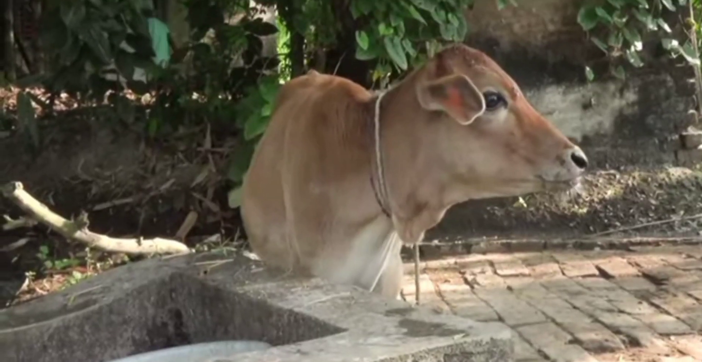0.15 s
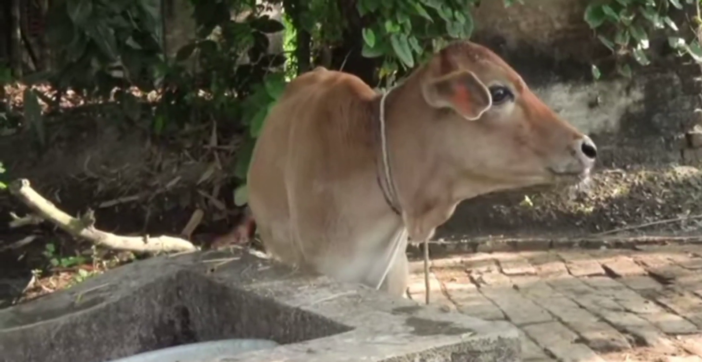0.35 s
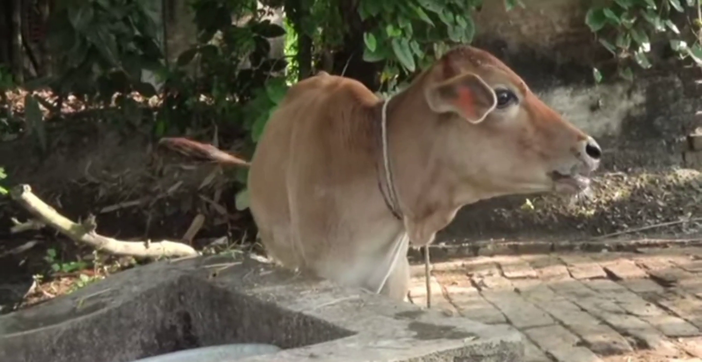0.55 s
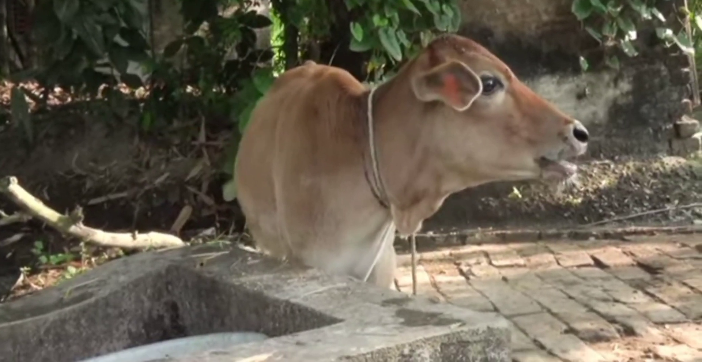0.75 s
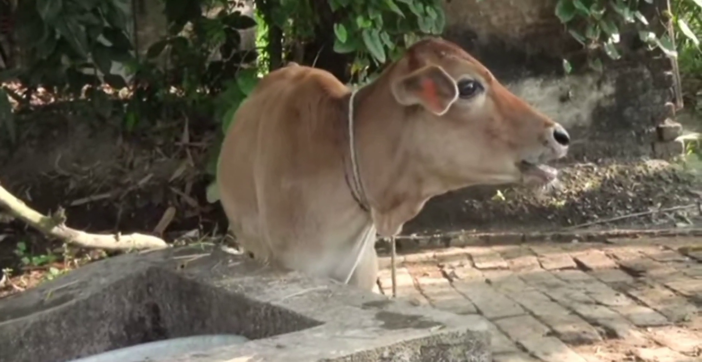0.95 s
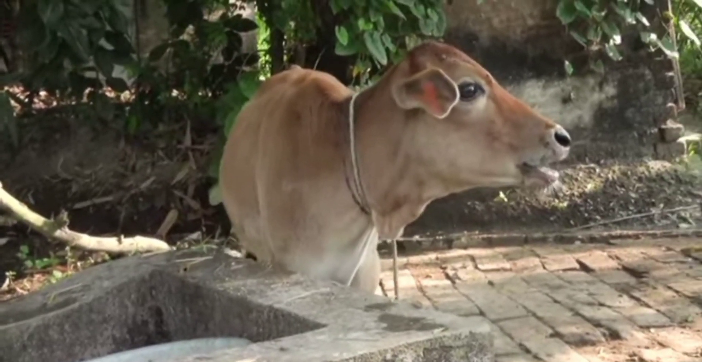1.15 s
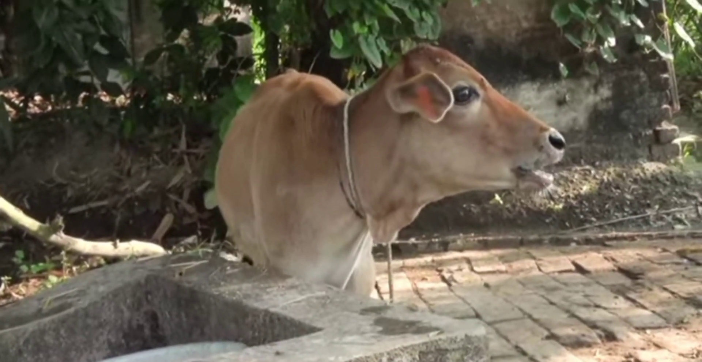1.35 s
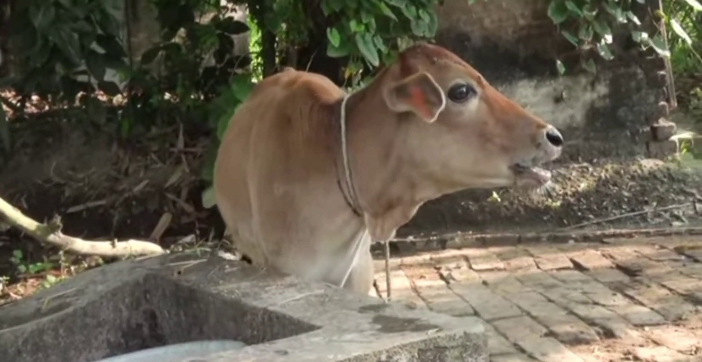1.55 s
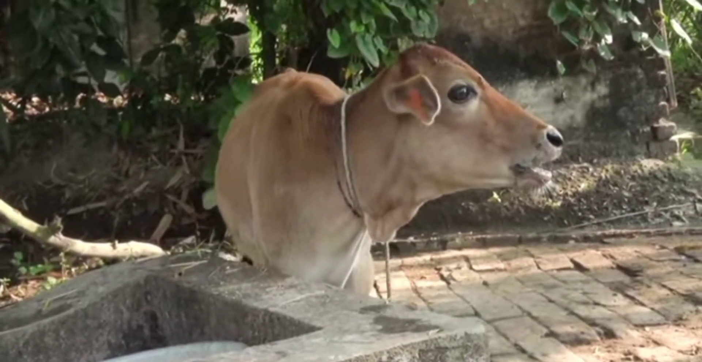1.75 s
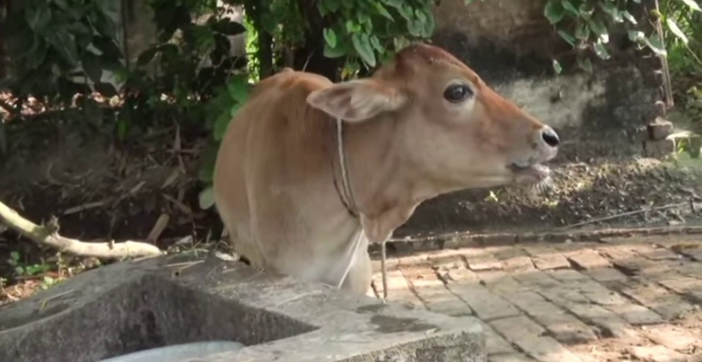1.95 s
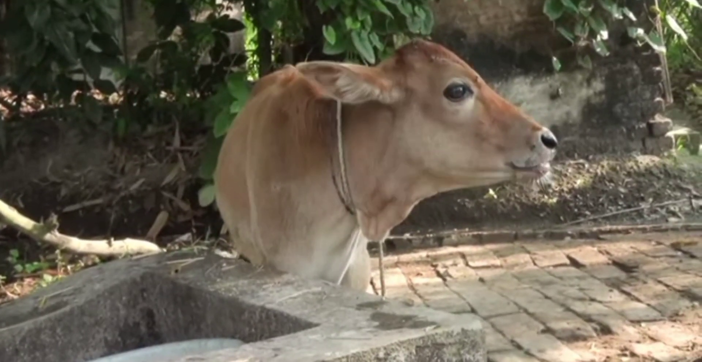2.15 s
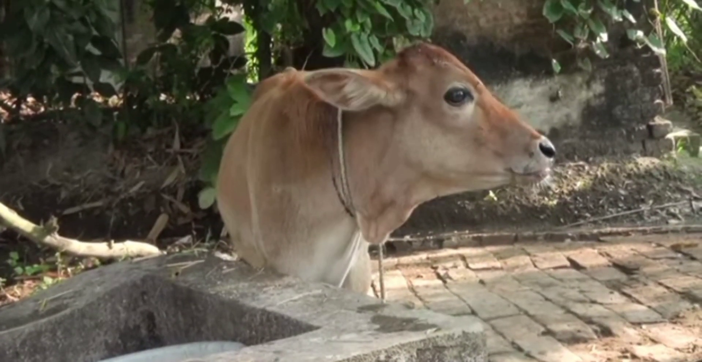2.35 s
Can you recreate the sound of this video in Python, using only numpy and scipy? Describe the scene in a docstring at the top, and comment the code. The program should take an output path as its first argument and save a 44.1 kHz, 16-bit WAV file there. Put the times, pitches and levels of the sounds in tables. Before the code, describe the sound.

One long calf moo in a small walled yard: faint mouth smacks and a nostril puff first, a raspy squeaky onset, a steady reedy call, then a croaky falling end, heard close with short dull reflections.

```python
"""A young calf gives one long moo in a walled village yard, over a low rumble and air hiss.
First come two small ticks (decaying noise), then a short snort (a gated blast of coloured noise).
The call opens as a hoarse rasp: noise excites sliding resonances. It locks into a clear buzzing tone,
fold pulses filtered by throat and mouth, that arches in pitch. Last it runs down into slow, rough
pulses as the mouth closes. Thin hisses accompany it; the yard scatters every sound of the calf."""
import sys
import numpy as np
from scipy import signal
from scipy.fft import rfft, irfft
from scipy.io import wavfile
from scipy.ndimage import uniform_filter1d, map_coordinates

SR = 44100
rng = np.random.default_rng(int(sys.argv[2]) if len(sys.argv) > 2 else 0)


def digitize_waveform(pressure):
    """Quantize a signal to 16-bit integers and store it at the path in sys.argv[1].

    Rows of a 2-D input are taken as channels; values are limited to [-1, 1].
    """
    field = np.atleast_2d(pressure).T
    bounded = np.clip(field, -1, 1)
    quanta = np.round(bounded * 32767).astype(np.int16)
    wavfile.write(sys.argv[1], SR, quanta)


N = 108045
T = np.arange(N) / SR


def from_db(db):
    """Amplitude level: 20 dB is a tenfold gain."""
    return 10 ** (np.asarray(db) / 20)


def rms_one(x):
    """Power normalisation: scale to unit mean square."""
    return x / np.sqrt(np.mean(x ** 2) + 1e-20)


def in_time(rows):
    """Linear interpolation: join (t, value) rows with straight lines."""
    return np.interp(T, *np.transpose(rows))


def gate(start, end, edge):
    """Amplitude gating: tanh edges of scale edge (s) around a plateau of up to 1.08."""
    opening = 1 + np.tanh((T - start) / edge)
    closing = 1 + np.tanh((end - T) / edge)
    return 0.27 * opening * closing


def evened(x, span_s):
    """Envelope flattening: divide by the running RMS, so that the running power stays near one."""
    size = max(int(span_s * SR), 8)
    power = uniform_filter1d(uniform_filter1d(x * x, size), size)
    return x / np.sqrt(np.abs(power) + 1e-14)


def resonate(x, hz, width_hz):
    """Two-pole resonance, cascaded twice for steep skirts; unit gain near the peak."""
    r = np.exp(-np.pi * width_hz / SR)
    b = (1 - r * r) / 2 * np.array([1, 0, -1])
    a = [1, -2 * r * np.cos(2 * np.pi * hz / SR), r * r]
    once = signal.lfilter(b, a, x + 1e-18)
    return signal.lfilter(b, a, once)


def noise(spectrum):
    """Spectral shaping: white noise weighted over log frequency, then set to unit power."""
    hz, db = np.transpose(spectrum)
    bins_hz = np.fft.rfftfreq(N, 1 / SR)
    gain = from_db(np.interp(np.log(bins_hz + 1), np.log(hz), db))
    return rms_one(irfft(rfft(rng.standard_normal(N)) * gain, N))


def sliding(x, factor, colour):
    """Time-scaling principle: a fixed filter on a stretched clock has frequencies moved by factor."""
    clock = np.cumsum(factor)
    source_index = np.interp(np.arange(int(clock[-1])), clock, np.arange(N))
    stretched = map_coordinates(x, [source_index], order=3)
    return map_coordinates(colour(stretched), [clock], order=3)


# relative noise spectra of low rumble, open air and faint top hiss: f/Hz, density level/dB
RUMBLE = [(18, -60), (30, -27), (43, -14.5), (70, -28.5), (91, -16), (121, -5), (166, 2), (206, -1),
          (258, -14), (317, -12.5), (343, -10), (384, -10), (450, -9.5), (580, -55.5), (990, -120)]
AIR = [(180, 8), (300, -6.5), (397, -1), (500, -4.5), (685, 0), (953, -9), (1240, -5.5), (1700, -3.5),
       (2320, -8.5), (2740, -6), (3940, -13), (6250, -17.5), (15500, -36.5)]
SIZZLE = [(6000, -20), (10000, -12), (15000, 6.5)]
# their levels, lower during the call: t/s, level/dB
RUMBLE_LEVEL = [(0.0, -28.5), (0.03, -38), (0.3, -41.5), (0.37, -34.5), (0.7, -43), (1.38, -54.5),
                (2.05, -48.5), (2.38, -41), (2.45, -41)]
AIR_LEVEL = [(0, -35), (.15, -32.5), (.32, -32), (.45, -30.5), (.65, -43), (2.1, -46.5), (2.28, -39),
             (2.45, -37)]
SIZZLE_LEVEL = [(0, -55), (.4, -63), (.65, -82.5), (2.1, -67), (2.3, -59), (2.45, -52)]


def background():
    """Superposition of independent noise bands: a low rumble, open-air hiss and a faint top hiss."""
    layers = ((RUMBLE, RUMBLE_LEVEL), (AIR, AIR_LEVEL), (SIZZLE, SIZZLE_LEVEL))
    return sum(noise(spectrum) * from_db(in_time(level)) for spectrum, level in layers)


YARD_DB = -16  # energy of the whole tail
YARD_T60_S, YARD_DELAY_S, YARD_CUT_HZ = 0.27, 0.0017, 4350


def yard(x):
    """Diffuse reverberation: walls and paving return a short, dull, exponentially decaying scatter."""
    t = T[:SR // 2]
    tail = rng.standard_normal(len(t)) * from_db(-60 * t / YARD_T60_S) * (t > YARD_DELAY_S)
    tail = signal.sosfilt(signal.butter(2, YARD_CUT_HZ, fs=SR, output="sos"), tail)
    return from_db(YARD_DB) * signal.fftconvolve(x, tail / np.linalg.norm(tail))[:N]


# small wet ticks: t/s, level/dB
TICKS = [(0.0187, -20), (0.077, -27)]
# their relative spectrum: f/Hz, density level/dB
TICK = [(470, -47), (800, -16), (1730, 2), (2690, -10.5), (3940, 1), (5350, -40), (6050, -8), (7100, -1),
        (8740, -28), (15000, -53)]
TICK_DECAY_S = 0.0048  # time to fall to 1/e


def ticks():
    """Impulsive excitation: instant onsets and exponential decay make tiny bright smacks."""
    envelope = 0
    for start, db in TICKS:
        decay = np.exp(-np.abs(T - start) / TICK_DECAY_S)
        envelope = envelope + from_db(db) * (T >= start) * decay
    return noise(TICK) * envelope


# relative spectrum of the snort: f/Hz, density level/dB
SNORT = [(290, -50), (500, -22), (766, -32), (1030, 1.5), (1300, -13), (2230, -9), (2430, -6), (3560, 1.5),
         (5160, -21), (7680, -37), (8250, -18), (8990, -31.5), (15000, -36)]
SNORT_START_S, SNORT_END_S, SNORT_EDGE_S, SNORT_DB = 0.22, 0.25, 0.0017, -21
SNORT_SWELL_DB, SNORT_SWELL_S = -26, 0.029  # softer flow around the blast; Gaussian deviation


def snort():
    """Turbulent jet noise: a short nostril blast inside a softer swell, their powers added."""
    blast = from_db(SNORT_DB) * gate(SNORT_START_S, SNORT_END_S, SNORT_EDGE_S)
    middle = (SNORT_START_S + SNORT_END_S) / 2
    swell = from_db(SNORT_SWELL_DB) * np.exp(-.5 * ((T - middle) / SNORT_SWELL_S) ** 2)
    return noise(SNORT) * np.hypot(blast, swell)


# thin hisses of air, before the gate: start t/s, end t/s, level/dB
HISSES = [(0.246, 0.276, -35.5), (0.566, 0.637, -44), (1.526, 1.707, -47.5)]
HISS_HZ, HISS_WIDTH_HZ = 6440, 630


def hiss():
    """Resonant filtering of turbulence: air whistles thinly past nose and lips."""
    envelope = sum(from_db(db) * gate(start, end, edge=0.0025) for start, end, db in HISSES)
    return envelope * rms_one(resonate(rng.standard_normal(N), HISS_HZ, HISS_WIDTH_HZ))


# squeaks and rasps of the tight throat; the width is for one resonator pass at the mean frequency,
# the level before the gate: start t/s, end t/s, first f/Hz, last f/Hz, width/Hz, level/dB
RASPS = [(.385, .495, 1413, 1399, 56.6, -29.5), (0.462, 0.558, 3854, 3560, 162, -28.5),
         (0.474, 0.561, 1040, 944.4, 192, -17.5), (0.487, 0.53, 4050, 4090, 256, -26.5),
         (0.492, 0.584, 579.2, 534.2, 70.7, -21), (0.484, 0.647, 2043, 2024, 120, -29.5),
         (0.527, .572, 2230, 2050, 222, -17.5), (0.559, 0.631, 941, 953.5, 70.7, -21.5),
         (0.568, 0.604, 467.5, 399.8, 78.4, -25), (0.601, 0.65, 2670, 2680, 108, -23),
         (0.628, 0.699, 1707, 1787, 60, -18), (0.633, 0.708, 1300, 1380, 60, -25),
         (1.994, 2.08, 2018, 2027, 29.7, -20.5), (2.076, 2.198, 2034, 2035, 80, -28)]
RASP_EDGE_S, RASP_EVEN_S = 0.017, .012
RASP_AIR_DB = -12.5  # broad hiss relative to its squeak


def rasp():
    """Noise-excited resonance: turbulence in the tight throat catches one sliding mode after another."""
    out = 0
    for start, end, first_hz, last_hz, width, db in RASPS:
        flow = rng.standard_normal(N)
        mean_hz = (first_hz + last_hz) / 2
        squeak = evened(resonate(flow, mean_hz, width), RASP_EVEN_S)
        air = from_db(RASP_AIR_DB) * rms_one(resonate(flow, mean_hz, width_hz=930))
        # reading at a varying speed slides the frequency
        read_index = np.cumsum(in_time([(start, first_hz), (end, last_hz)]) / mean_hz)
        slid = map_coordinates(squeak + air, [read_index], order=3, mode="mirror")
        out = out + from_db(db) * slid * gate(start, end, RASP_EDGE_S)
    return out


# valleys between the resonances, before the throat's slide: f/Hz, width/Hz
ANTIRESONANCES = [(820, 200), (1232, 150), (2410, 135), (4050, 89), (5300, 350)]


def valleys(x):
    """Antiresonance: side cavities swallow the sound between the resonances."""
    for hz, width in ANTIRESONANCES:
        x = signal.lfilter(*signal.iirnotch(hz, hz / width, fs=SR), x)
    return x


# pulse rate of the vocal folds: t/s, f/Hz
PITCH = [(.6, 106), (.646, 108.3), (.67, 110.5), (.722, 115.4), (.75, 116.8), (.83, 118.7), (.9, 119.7),
         (1.05, 121.3), (1.2, 122.25), (1.35, 123), (1.5, 122.4), (1.65, 120.5), (1.722, 118.4),
         (1.82, 115.1), (1.902, 110.3), (1.978, 100.5), (2.05, 91), (2.1, 77), (2.15, 60), (2.22, 51)]
# unsteadiness of the folds: t/s, roughness (0-1)
ROUGHNESS = [(.62, .4), (.67, .26), (.73, .1), (.82, .04), (1.55, .04), (1.8, .07), (1.9, .17), (1.97, .26),
             (2.04, .36), (2.2, .44)]
JITTER, SHIMMER_DB = .02, 2.5  # deviations at roughness 1: timing in cycles, pulse level in dB
AIR_SHARE = 2.0  # puff RMS relative to the pulses, times roughness
AIR_DECAY, AIR_LOW_HZ = 2.6, 1600  # puff decay per cycle; high-pass corner


def folds():
    """Glottal source: a closure pulse and an air puff per cycle; roughness upsets timing and strength."""
    pitch, rough = in_time(PITCH), np.clip(in_time(ROUGHNESS), 0, 1)
    cycles = np.cumsum(pitch) / SR
    at = np.interp(np.arange(1, int(cycles[-1])), cycles, np.arange(N))
    i = at.astype(int)
    chance = rng.standard_normal((len(at), 2))
    at = at + JITTER * rough[i] * chance[:, 0] * SR / pitch[i]
    strength = from_db(SHIMMER_DB * rough[i] * chance[:, 1])
    # a windowed sinc places each pulse between samples
    taps = at.astype(int)[:, None] + np.arange(-7, 9)
    offset = taps - at[:, None]
    shape = np.sinc(offset) * np.sinc(offset / 8)
    pulses = np.zeros(N)
    np.add.at(pulses, np.clip(taps, 0, N - 1), shape * strength[:, None])
    high_pass = signal.butter(1, AIR_LOW_HZ, "high", fs=SR, output="sos")
    air = signal.sosfilt(high_pass, rng.standard_normal(N))
    puffs = rms_one(air * np.exp(-AIR_DECAY * (cycles % 1)))
    return rms_one(pulses) + AIR_SHARE * rough * puffs


# resonances of throat and mouth, before the slide; the width is for one resonator pass,
# the level relative within its group: f/Hz, width/Hz, level/dB
LOW_MODES = [(492.3, 100.5, 8.5), (546, 37, -15)]
SECOND_MODES = [(1084.4, 111, 0.71)]
MIDDLE_MODES = [(1650, 226, -0.5), (2090, 223, -12)]
THIRD_MODES = [(2633, 146, 0)]
TREBLE_MODES = [(3120, 191, 5.5), (3290, 160, 3.5), (3786, 190, 4), (4240, 170, -3.5), (4666, 185, -8.5),
                (4806, 300, -6)]
TOP_MODES = [(5730, 380, -8), (6010, 230, 1.5), (7100, 140, 3.5), (7600, 170, 4.5), (8010, 200, 0)]
# level of each group before the gate; the middle is the bulk of the call: t/s, level/dB
LOW_LEVEL = [(.6, -32), (0.634, -33), (0.701, -25.5), (.85, -29), (1.099, -27.5), (1.35, -31),
             (1.572, -27.5), (1.72, -32.5), (1.93, -33.5), (2, -29), (2.191, -25.5), (2.22, -33),
             (2.26, -37)]
SECOND_LEVEL = [(0.6, -21), (0.744, -28.5), (0.84, -39), (1.022, -30), (1.158, -28.5), (1.524, -25),
                (1.674, -32), (1.724, -41.5), (1.818, -29), (1.958, -28), (2.166, -39), (2.2, -32),
                (2.25, -72), (2.27, -63)]
MIDDLE_LEVEL = [(.6, -27), (0.631, -22), (.655, -25), (.72, -19.5), (.88, -20.5), (1.1, -18.5), (1.36, -18),
                (1.6, -21.5), (1.71, -19.5), (1.78, -19.5), (1.889, -24), (1.96, -16), (1.999, -26),
                (2.074, -22.5), (2.092, -28), (2.169, -30.5), (2.21, -41), (2.27, -54)]
THIRD_LEVEL = [(0.6, -46.5), (0.626, -22), (0.668, -32), (0.724, -22), (0.902, -25.5), (0.972, -20.5),
               (1.152, -22), (1.218, -23.5), (1.502, -25), (1.58, -20.5), (1.668, -21.5), (1.702, -28),
               (1.93, -23), (2.05, -25), (2.27, -53)]
TREBLE_LEVEL = [(0.6, -33), (0.654, -27.5), (0.706, -31), (0.958, -33), (1.004, -25), (1.046, -27),
                (1.492, -30.5), (1.594, -24), (1.842, -33), (1.966, -27), (2.042, -32), (2.078, -28.5),
                (2.176, -39.5), (2.27, -52)]
TOP_LEVEL = [(0.6, -54), (0.72, -54), (1.71, -48), (1.758, -57), (1.896, -43), (2.186, -67), (2.204, -54),
             (2.27, -67)]
# groups of the vocal tract: resonances, their level, exponent of the throat's slide they follow (0-1)
GROUPS = [(LOW_MODES, LOW_LEVEL, 0.46), (SECOND_MODES, SECOND_LEVEL, 0.86), (MIDDLE_MODES, MIDDLE_LEVEL, 0),
          (THIRD_MODES, THIRD_LEVEL, 0), (TREBLE_MODES, TREBLE_LEVEL, 0.86), (TOP_MODES, TOP_LEVEL, 1)]
# the throat tightens and slackens, sliding some resonances: t/s, frequency factor
TENSION = [(.6, .95), (.8, 0.98), (1.1, 0.99), (1.5, 0.97), (1.8, 0.95), (1.95, 0.93), (2.05, 0.92),
           (2.25, 0.89)]
VOICE_START_S, VOICE_END_S, VOICE_FADE_S, VOICE_EVEN_S = .624, 2.25, 0.0052, .028


def moo():
    """Source-filter principle: the folds drive groups of resonances, with valleys between them."""
    tension, out = in_time(TENSION), 0
    source = sliding(folds(), tension, valleys)
    for modes, level, follows in GROUPS:
        def ring(x):
            """Parallel resonance: the modes of one group add."""
            return sum(from_db(db) * resonate(x, hz, width) for hz, width, db in modes)

        ringing = sliding(source, tension ** follows, ring)
        out = out + evened(ringing, VOICE_EVEN_S) * from_db(in_time(level))
    return out * gate(VOICE_START_S, VOICE_END_S, VOICE_FADE_S)


def scene():
    """Linear superposition: the calf close by, its reflections and the background."""
    calf = ticks() + snort() + hiss() + rasp() + moo()
    return (background() + yard(calf) + calf)[None]


CUTOFF_HZ = 15600


def record(dry):
    """Band limitation: the microphone loses the deepest bass; the top is cut steeply."""
    thinned = signal.sosfilt(signal.butter(2, 85, "high", fs=SR, output="sos"), dry)
    return signal.sosfilt(signal.ellip(12, .1, 90, CUTOFF_HZ, fs=SR, output="sos"), thinned)


dry = scene()
out = record(dry)
digitize_waveform(out)
```